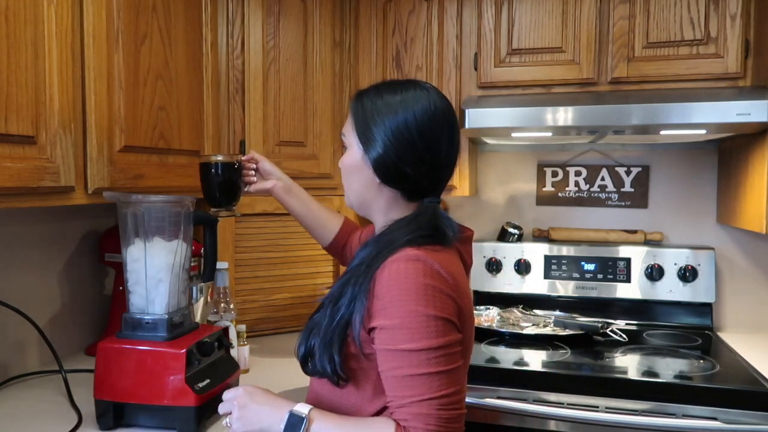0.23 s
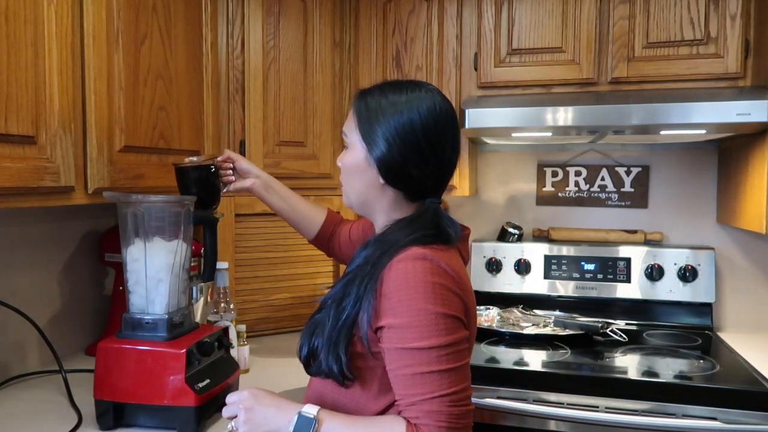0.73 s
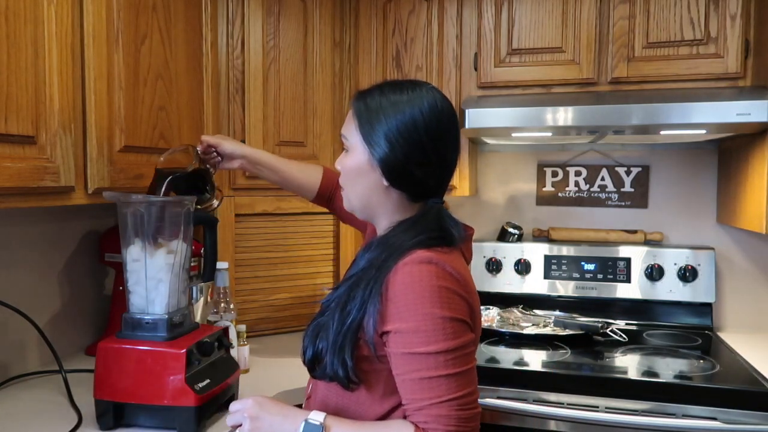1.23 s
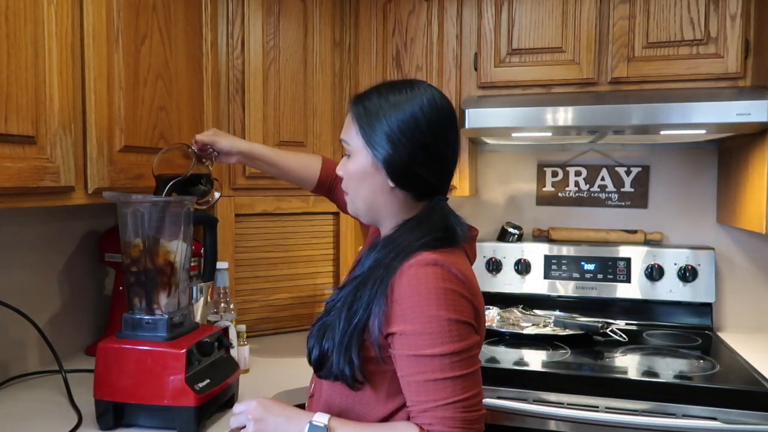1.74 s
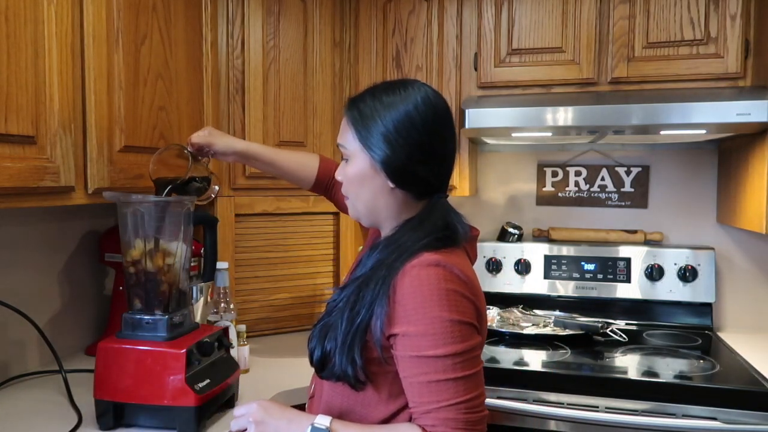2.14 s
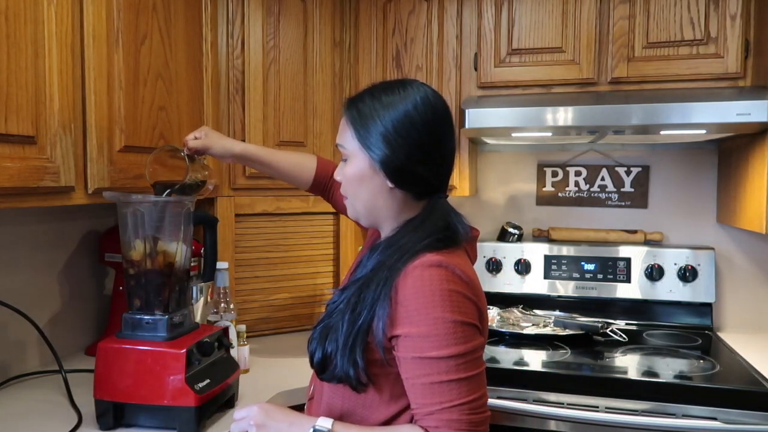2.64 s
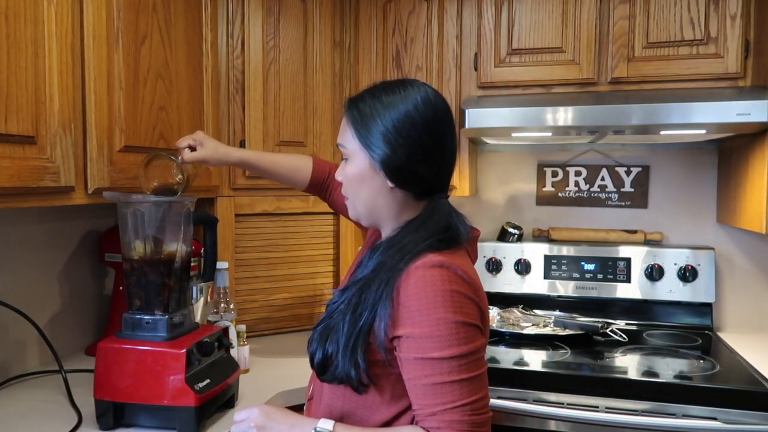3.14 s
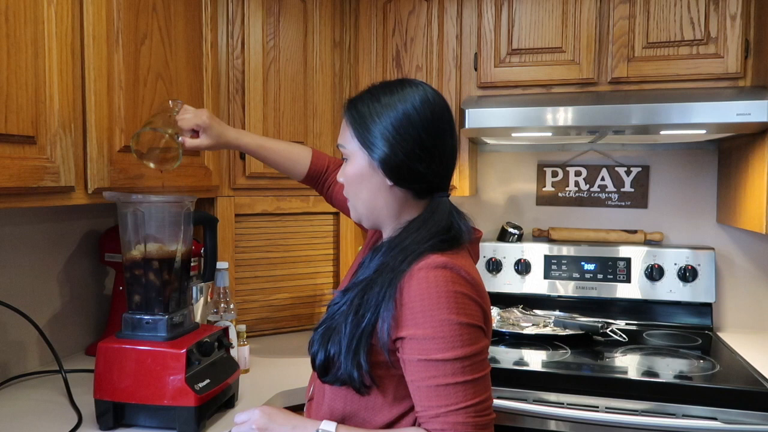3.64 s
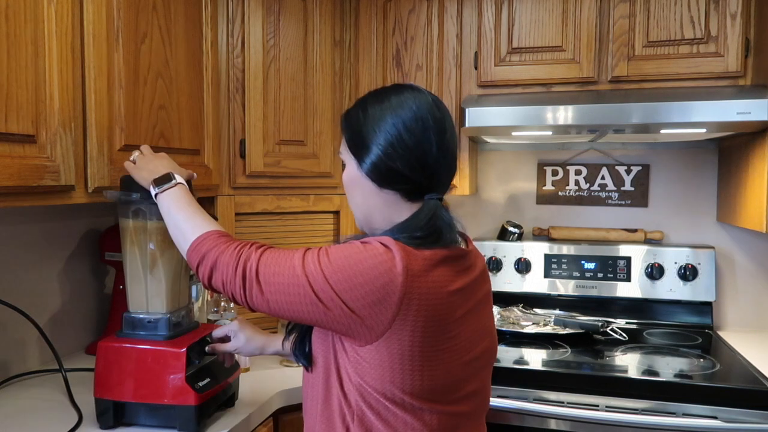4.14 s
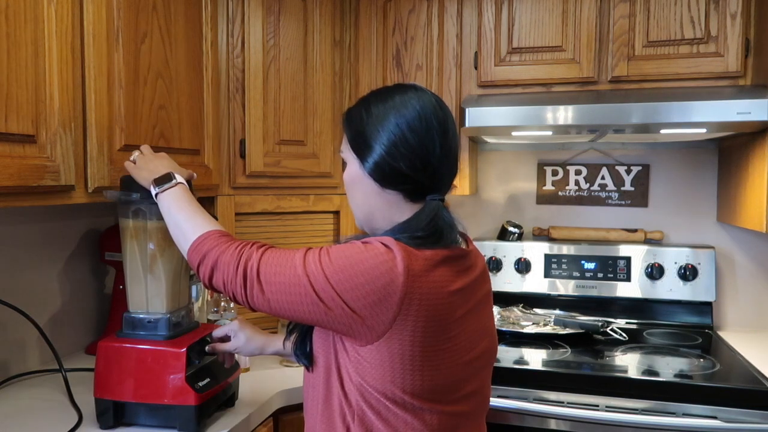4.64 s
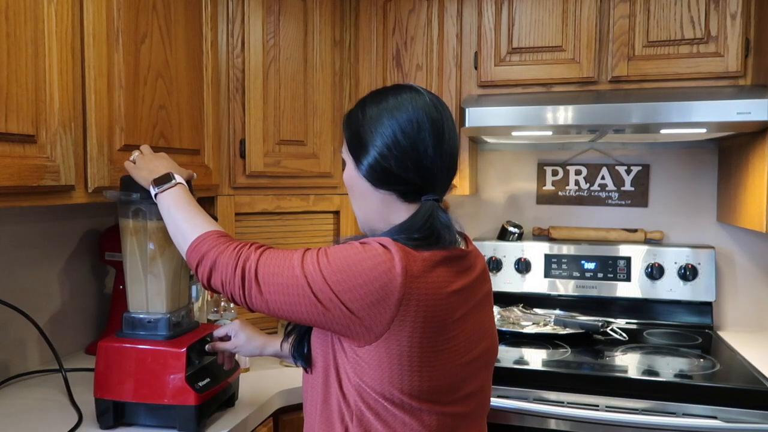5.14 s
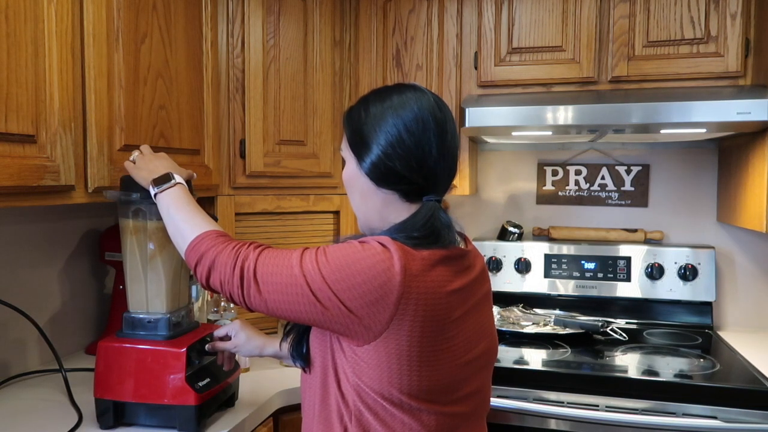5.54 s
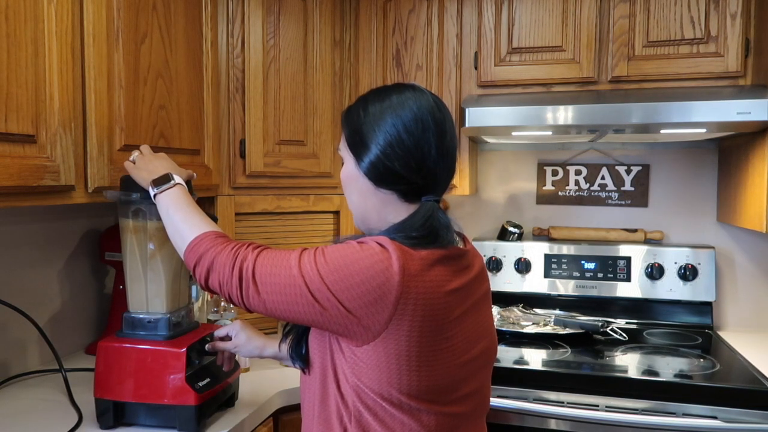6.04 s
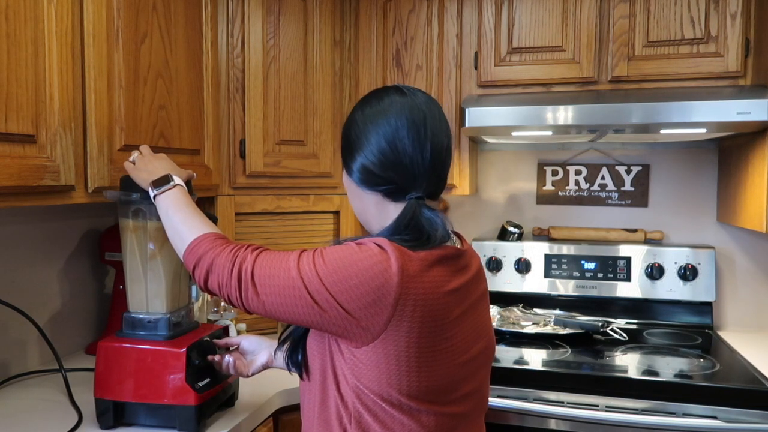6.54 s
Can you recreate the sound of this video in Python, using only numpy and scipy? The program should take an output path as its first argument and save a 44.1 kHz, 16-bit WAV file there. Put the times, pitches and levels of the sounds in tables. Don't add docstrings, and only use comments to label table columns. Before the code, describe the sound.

In a quiet home kitchen with faint refrigerator hum, two small hollow knocks sound on the counter. Coffee is poured over ice in a plastic jar: soft fizz, sliding cubes, clacks and tiny cracks, thinning out before a last few clacks. With a sudden cut a blender is roaring, its hum jolting as blades smash ice, then rising and smoothing into churning slush. Stereo microphone nearby, little echo.

```python
import sys
import numpy as np
from scipy import signal
from scipy.fft import rfft, irfft, next_fast_len
from scipy.io import wavfile

SR = 44100
rng = np.random.default_rng(int(sys.argv[2]) if len(sys.argv) > 2 else 0)


def unload_audio(sound):
    columns = np.transpose(np.atleast_2d(sound))
    steps = np.round(np.clip(columns, -1, 1) * 32767)
    wavfile.write(sys.argv[1], SR, steps.astype(np.int16))


def volts(x):
    e = np.asarray(x, float) / 20
    return 10 ** e


N = 299039

# [t/s, level/dB]
MOTOR_LOAD = [(3.75, -47), (3.8, -30.5), (3.88, -21), (4, -20), (4.2, -21), (4.4, -20), (4.55, -22),
              (4.9, -20), (5.15, -23), (5.33, -20), (5.43, -24), (5.7, -23.5), (6.0, -23), (6.4, -24.5),
              (6.78, -24)]
# [t/s, f/Hz]
BLADE_RATE = [(3.76, 221.7), (3.89, 240), (4.15, 248.7), (4.27, 263.3), (4.5, 257.9), (4.63, 252),
              (4.72, 264.3), (4.9, 269.2), (4.98, 254.6), (5.1, 256), (5.2, 251), (5.33, 269.5),
              (5.4, 283.6), (5.7, 291.3), (6.78, 287.4)]
# [multiple of blade rate, level/dB against the rumble]
BLADE_ORDERS = [(1, 0), (2, -15.5)]
# [t/s, share]
ICE_LEFT = [(3.7, .8), (5.2, .8), (5.5, .5), (6.8, .5)]
# [t/s, depth/dB, length/s]
LEVEL_DIPS = [
    (4.474, 2.5, 0.056),
    (4.765, 1.5, 0.012),
    (4.99, 10.5, 0.026),
    (5.407, 7.5, 0.23),
    (6.103, 5, 0.15),
]
# [t/s, peak level/dB]
JOLTS = [(3.837, -18), (3.885, -14.5), (3.996, -8.5), (4.111, -15), (4.169, -15), (4.238, -12.5),
         (4.268, -13), (4.379, -14), (4.539, -15), (4.575, -15.5), (4.61, -16), (4.747, -15), (4.842, -16),
         (4.877, -15), (4.958, -11.5), (5.095, -12), (5.164, -14), (5.324, -15.5), (5.653, -21),
         (5.686, -14.5), (5.722, -17.5), (5.944, -14), (6.06, -13), (6.287, -17), (6.32, -21), (6.425, -9),
         (6.626, -14), (6.688, -18.5)]
# [f/Hz, width/Hz, level/dB]
BASE_MODES = [(230.7, 20, -5.5), (352, 22.5, -9), (538, 36, -10.5)]
# [f/Hz, level/dB per Hz]
RUMBLE = [(26, -45), (45, -33), (90, -32), (140, -26), (235, 3), (323, -9), (430, -6.5), (543, -7),
          (750, -17.5), (1000, -17.5), (1400, -76)]
CHURN = [(700, -1.5), (1000, -10.5), (1350, -8), (1700, 2.5), (2200, 4.5), (2800, -2), (4000, -11),
         (5200, -19)]
SPRAY = [(3000, -4), (4500, -3), (6500, -6), (8500, -10), (10500, -21), (12500, -16), (14500, -22)]
# [t/s, peak level/dB, ring f/Hz]
HITS = [(3.793, -25, 2440), (3.832, -25, 2600), (3.9134, -19, 2360), (3.9538, -14.5, 1960),
        (4.026, -20, 1920), (4.0828, -18, 2250), (4.186, -18, 2380), (4.2791, -12, 1960),
        (4.3173, -11.5, 2160), (4.3395, -13, 1740), (4.3892, -15, 2190), (4.51, -16.5, 2250),
        (4.613, -16, 2550), (4.751, -21, 2600), (4.799, -18.5, 1930), (4.816, -19.5, 2090),
        (4.884, -23, 2660), (4.914, -33, 3428), (4.96, -22, 2650), (5.005, -13.5, 3770),
        (5.181, -17.5, 2090), (5.228, -21.5, 2370), (5.387, -14, 1790), (5.8323, -24, 1980),
        (5.875, -21, 2150), (6.043, -22.5, 1818), (6.0691, -16.5, 3270), (6.219, -22.5, 3550)]
# [t/s, peak level/dB, ring f/Hz]
SPLINTERS = [(3.948, -13.5, 5760), (4.0156, -16.5, 4930), (4.042, -11.5, 7300), (4.0874, -14, 5330),
             (4.161, -20, 5840), (4.1865, -11, 6300), (4.241, -14, 5200), (4.2791, -7, 4600),
             (4.317, -12.5, 4920), (4.359, -5.5, 5300), (4.388, -7, 5230), (4.455, -15, 4380),
             (4.495, -21, 6300), (4.508, -18, 4570), (4.6086, -12, 4970), (4.676, -18, 5030),
             (4.797, -23, 5500), (4.818, -15.5, 4730), (4.9607, -7, 5600), (5.006, -8, 5200),
             (5.179, -7.5, 5650), (5.394, -33, 4450), (5.679, -31, 6715), (5.843, -23, 6500),
             (5.934, -27, 6620), (6.005, -17, 6100), (6.045, -14, 7300), (6.0672, -7, 7000),
             (6.2164, -10, 5510)]
# [t/s, peak level/dB]
BANGS = [
    (4.2795, -25),
    (4.3884, -12),
    (5.0055, -26),
    (5.3892, -2.5),
    (6.0701, -15),
]
# [t/s, peak level/dB]
SLAPS = [
    (4.62, -21),
    (4.79, -18),
    (5.385, -22),
    (5.69, -26.5),
    (5.872, -18),
    (6.43, -33),
    (6.63, -27.5),
    (6.695, -24.5),
]
# [t/s, peak level/dB, ring f/Hz]
CHOPS = [(3.769, -29, 3120), (3.8277, -35, 3340), (3.8711, -28, 3140), (3.896, -25, 2850),
         (3.9314, -16, 3410), (3.9505, -27, 3250), (4.0177, -25, 3660), (4.082, -9, 3580),
         (4.1611, -36, 3280), (4.1854, -33, 3940), (4.2407, -26, 4500), (4.2792, -16, 4250),
         (4.316, -10, 3540), (4.359, -14, 3460), (4.3884, -7, 3500), (4.4557, -24, 3550),
         (4.494, -16, 3700), (4.51, -18.5, 4600), (4.565, -16, 3601), (4.6114, -26, 3700),
         (4.6663, -20, 3730), (4.6882, -16.5, 4430), (4.7375, -20, 3070), (4.798, -27, 3332),
         (4.815, -8.5, 4136), (4.8846, -24, 3160), (4.9132, -11, 3420), (4.962, -19, 3880),
         (5.006, -15, 3692), (5.0964, -22, 3250), (5.173, -21, 2970), (5.2568, -19, 3600),
         (5.2988, -18, 3250), (5.3891, -7, 3730), (5.6076, -27, 3050), (6.006, -21, 4500),
         (6.0431, -22, 3664), (6.0701, -6, 3300), (6.1738, -24, 3570), (6.2197, -14.5, 3550),
         (6.5513, -22, 3383), (6.6144, -22, 3430), (6.641, -32, 3005), (6.667, -25, 3340)]
# [t/s, peak level/dB, ring f/Hz]
CHIPS = [(3.913, -44, 8280), (4.0435, -36, 7900), (4.2805, -33, 8470), (4.3176, -42, 8720),
         (4.34, -34, 12600), (4.361, -18, 8003), (4.39, -17.5, 7800), (4.4528, -28, 8030),
         (4.58, -36, 8050), (4.6094, -35, 12300), (4.798, -38, 10600), (4.8823, -35, 8950),
         (4.9626, -39, 8000), (5.005, -20, 8800), (5.1786, -41, 12530), (5.2996, -31, 8260),
         (5.3916, -26.5, 11700), (5.7603, -40, 8430), (5.798, -32, 9400), (6.0052, -37, 8480),
         (6.0451, -36, 8040), (6.0691, -13, 8000), (6.2173, -30, 8430), (6.5513, -33.5, 11600)]
# [peak t/s, peak level/dB, 10 dB fall/s, boom level/dB against the slide]
SHIFTS = [(1.41, -41.5, 0.5, -39), (1.56, -37, 0.02, -26), (1.682, -30.5, 0.34, -9),
          (1.899, -32, 0.07, -10), (2.1, -50.5, 0.14, -1.5), (2.36, -43.5, 0.36, -4), (2.6, -54, 1.1, -2),
          (2.96, -52.5, 0.3, 0.5), (3.28, -43, 0.1, -5.5), (3.46, -37, 0.08, 5), (3.55, -31, 0.05, -14)]
# [t/s, level/dB]
STREAM = [(1.335, -58), (1.37, -34.5), (1.54, -56.5), (1.9, -38.5), (2.12, -42.5), (2.2, -59), (2.35, -59),
          (2.6, -55), (2.85, -57.5), (3.1, -58), (3.3, -53.5), (3.45, -57.5), (3.62, -68.5)]
# [f/Hz, level/dB per Hz]
SLIDE = [(300, -35), (600, -8.5), (1150, -10.5), (1600, 0), (2250, -2), (3300, -6), (4400, -22)]
FIZZ = [(3300, -0.5), (4200, -0.5), (4900, -2), (6000, 1), (8000, -10), (10000, -21), (12500, -22),
        (15500, -44)]
# [f/Hz, width/Hz, level/dB]
JAR_MODES = [(545, 69, 1), (685, 71, -6), (982, 19, -6.5), (1540, 113, 10), (1890, 65, 0), (2230, 90, 9.5),
             (2827, 36, 6), (3300, 72, 0.5)]
# [t/s, peak level/dB, ring f/Hz, low thud level/dB]
CLACKS = [(1.352, -40, 4000, -40), (1.371, -42.5, 980, -40), (1.4088, -28, 2700, -50),
          (1.4336, -23, 2080, -50), (1.4607, -21.5, 1830, -16), (1.5181, -27, 1660, -16),
          (1.5754, -19.5, 1950, -13), (1.621, -26.5, 2670, -38), (1.6866, -19.5, 3200, -4.5),
          (1.7878, -23.5, 1700, -25), (1.8352, -26, 1640, -6.5), (1.8707, -21.5, 2090, -6.5),
          (2.0211, -24.5, 2630, -22), (2.0585, -24.5, 2100, -18.5), (2.0814, -24.5, 2230, -38),
          (2.333, -28.5, 1500, -5), (2.352, -35, 2120, -6), (2.375, -26, 1560, -11),
          (2.4683, -27.5, 2030, -13.5), (2.56, -37.5, 1610, 7.5), (2.569, -31.5, 2300, -6.5),
          (2.7806, -33.5, 2330, -6.5), (2.8704, -40, 3320, -10.5), (2.9357, -37.5, 3300, -0.5),
          (2.962, -43, 1700, 3), (2.982, -37.5, 1620, -10), (3.2764, -39, 1800, -11.5),
          (3.3418, -26, 3850, -21), (3.4212, -36, 1590, 8.5), (3.4653, -31, 1580, -11),
          (3.4881, -19, 2160, -16), (3.56, -29.5, 2580, -1.5), (3.605, -26.5, 1970, -17)]
# [t/s, peak level/dB, ring f/Hz]
CRACKS = [(1.337, -47, 11300), (1.3435, -50, 6900), (1.368, -37, 6440), (1.379, -43, 6600),
          (1.417, -38, 4300), (1.484, -35.5, 6360), (1.5114, -38.5, 5740), (1.597, -41, 6400),
          (1.765, -39, 6100), (1.808, -44, 6100), (1.864, -32.5, 5500), (1.9463, -45, 5850),
          (2.018, -47, 5800), (2.073, -27.5, 4570), (2.135, -37, 5860), (2.335, -44.5, 5520),
          (2.405, -39, 4550), (2.47, -45, 4630), (2.5516, -44.5, 6570), (2.6284, -43, 5550),
          (2.7044, -46, 5840), (2.838, -43, 7070), (2.87, -42.5, 5600), (3.144, -46, 5950),
          (3.354, -38, 4300), (3.45, -48, 6200), (3.485, -45, 4640), (3.5378, -35, 4660)]
# [t/s, peak level/dB, f/Hz]
SQUEAKS = [
    (2.725, -40, 3430),
    (2.834, -41, 3400),
    (2.855, -40, 3440),
    (2.983, -40, 1560),
]
# [t/s, peak level/dB, ring f/Hz]
TICKS = [(1.3993, -49, 8100), (1.4417, -42, 7930), (1.6009, -35.5, 7940), (1.6343, -40, 7880),
         (1.6882, -42, 7800), (1.7086, -34.5, 9350), (1.7585, -44, 11000), (1.7959, -45, 9150),
         (1.8279, -40, 8000), (1.8433, -35, 8460), (1.9715, -36, 8140), (2.0623, -45, 7600),
         (2.136, -34, 8200), (2.3272, -41, 8740), (2.3502, -50, 8790), (2.3831, -49, 8410),
         (2.4205, -44, 9070), (2.4719, -38, 8400), (2.5846, -40, 8700), (2.6101, -41, 7520),
         (2.6455, -39, 8400), (2.7138, -43, 8180), (2.8585, -37, 8200), (3.1863, -49, 11000),
         (3.2636, -45, 10900), (3.4192, -51, 8760), (3.4507, -47, 8800), (3.5405, -50, 7610),
         (3.7575, -45, 7200)]
# [t/s, peak level/dB, brightness level/dB, T60/s, hollow body level/dB]
KNOCKS = [
    (0.066, -39, -4, 0.05, -18),
    (0.075, -22.5, 5, 0.081, -6),
    (0.083, -23.5, -7, 0.1, -12),
    (0.131, -37, -5, 0.054, -25),
    (0.901, -34.5, 3.5, 0.053, -32),
    (0.906, -28, -3.5, 0.058, -27),
    (0.924, -36, -19, 0.043, -25),
    (1.016, -54.5, 0.5, 0.08, -5),
]
# [f/Hz, level/dB, T60/s]
COUNTER_MODES = [(754, 4, 0.057), (826, 10, 0.06), (913, 6.5, 0.035), (1100, -9, 0.036), (1500, 2.5, 0.048),
                 (1700, -1, 0.05), (2090, -2, 0.043), (2300, -4, 0.036)]
# [f/Hz, level/dB per Hz]
AIR = [(29, -57), (50, -35), (137, -15), (165, -9), (313, -7), (351, -7.5), (385, -10.5), (1060, -20),
       (1210, -21.5), (1420, -22.5), (12000, -45.5), (15600, -85), (22000, -120)]
# [f/Hz, likeness]
AIR_LIKENESS = [(60, 0.77), (240, 0.8), (950, 0.43), (3770, 0.28), (15000, -0.6)]
# [t/s, level/dB]
AIR_LEVEL = [(0, -3), (1.4, -3), (1.6, 5.5), (3.7, 2.5), (3.8, 1), (6.8, -44.5)]
# [f/Hz, rms level/dB]
FRIDGE = [(58, -91), (61, -85), (116, -77), (168, -72.5), (296, -74.5), (350, -69), (415, -74.5)]
# [f/Hz, phase/rad]
PORT_PHASE = [(100, 0), (3300, .05), (5500, .55), (7700, 1.0), (9100, 1.4), (11000, 1.6), (16000, 1.8)]
# [f/Hz, level/dB]
PORT_BALANCE = [(380, 0), (700, .5), (1300, 0), (2400, .6), (4400, 2.1), (8100, 2.6), (15000, .5)]
# [f/Hz, level/dB]
ROOM_SIDE = [(60, -24), (150, -27), (300, -30), (600, -24), (1200, -25), (2500, -19), (5000, -7),
             (8000, -2), (14000, 1)]
# [f/Hz, level/dB]
MICROPHONE = [(25, -16), (58, 0), (11000, 0), (13500, -3), (15000, -7), (17000, -25)]


def blender():
    blade_hz, load_db, churn_db, spray_db, gate = run_levels()
    lumps = in_time(ICE_LEFT)[0]
    surge = jolts()
    waver = 1 + 0.016 * lumps * drift(19.8)
    turn = 2 * np.pi * np.cumsum(blade_hz * waver) / SR
    tones = sum(np.sin(k * turn) * volts(db + lumps * (4.0 * drift(38) + 2.5)) for k, db in BLADE_ORDERS)
    shaft_db = -47 + 0.84 * (load_db + 21.5) + 2.0 * drift(2.8)
    shaft = volts(shaft_db) * np.sin(turn / 4)
    hum = volts(2.0 - 3.75 * lumps) * surge * tones
    rumble = volts(-8.5 + 3.7 * lumps) * surge ** 0.33 * base_rumble()
    churn = patchy(grains(1800, spread_db=2.5), CHURN, 2.0 * lumps, 3.55 * lumps + 1.5, rate=7.3)
    churn = churn + 0.37 * lumps * blips(250, CHURN, cycles=54.0)
    spray = patchy(grains(3300, spread_db=1.5), SPRAY, 3.8 * lumps, 4.5 * lumps, rate=6.4)
    spray = spray + 0.5 * lumps * blips(370, SPRAY, cycles=24.0)
    slush = volts(churn_db + 1.5) * churn + volts(spray_db) * spray
    return gate * (shaft + volts(load_db) * (hum + rumble) + slush + cooling_fan())


def run_levels():
    load_db, gate = in_time(MOTOR_LOAD)
    blade_hz = in_time(BLADE_RATE)[0]
    t = np.arange(N) / SR
    edge_s, recover_s = 0.013, 0.052
    for s, depth_db, length in LEVEL_DIPS:
        dip = np.minimum((t - s) / edge_s + 1, (s + length - t) / recover_s + 1)
        load_db = load_db - depth_db * np.clip(dip, 0, 1)
    stir_up_db = np.interp(t, (3.66, 3.92), (-13, 0))

    def driven(blows, base_db, share, blow_db, fall_s):
        s, peak_db, _ = np.transpose(blows)
        steady_db = base_db + stir_up_db + share * (load_db + 23.5)
        return level_of(volts(2 * steady_db) + swell(s, peak_db + blow_db, 0.008, fall_s))

    churn_db = driven(HITS, -37, share=0.99, blow_db=-15.5, fall_s=0.068)
    spray_db = driven(SPLINTERS, -44.5, share=0.38, blow_db=-24.5, fall_s=0.024)
    return blade_hz, load_db, churn_db, spray_db, gate


def jolts():
    s, db = np.transpose(JOLTS)
    free_db, surge_db, rise_s, fall_s = -4.5, 13.5, 0.0086, 0.024
    return np.sqrt(volts(2 * free_db) + swell(s + rise_s, db + surge_db, rise_s, fall_s))


def base_rumble():
    shake = rng.standard_normal(N) * volts(2.05 * drift(25))
    base = sum(volts(db) * rms_one(resonate(shake, hz, width)) for hz, width, db in BASE_MODES)
    noise = rng.standard_normal(N)
    return base + volts(-1.0) * patchy(noise, RUMBLE, shared_db=0.5, own_db=-4.5, rate=15.8)


def cooling_fan():
    return volts(-45) * rms_one(narrow(rng.standard_normal(N), 1120, 2230))


def blade_hits():
    out = np.zeros(N)
    for s, db, hz in HITS:
        add(out, s, db - 0.5, .055, lambda x: narrow(x, hz, 480) + 0.31 * narrow(x, 3350, 1240), rise=0.00061)
    return out


def splinters():
    out = np.zeros(N)
    for s, db, hz in SPLINTERS:
        add(out, s, db - 6.0, .024, lambda x: narrow(x, hz, 1370) + 0.3 * narrow(x, 6300, 1600), rise=0.0013)
    return out


def bangs():
    out = np.zeros(N)
    for s, db in BANGS:
        add(out, s + 0.0011, db + 1.5, .011,
            lambda x: narrow(x, 2450, 1700) + 0.03 * narrow(x, 11500, 3000), rise=0.0004)
        add(out, s + 0.0032, db - 15.5, .09, lambda x: narrow(x, 3600, 1800), length=.15)
    return out


def slaps():
    out = np.zeros(N)
    for s, db in SLAPS:
        add(out, s, db, .08, lambda x: narrow(x, 542, 77) + 0.27 * narrow(x, 930.8, 127), rise=0.0049)
    return out


def chops_and_chips():
    out = np.zeros(N)
    for s, db, hz in CHOPS:
        add(out, s, db - 7.0, .022, lambda x: narrow(x, hz, 920), rise=0.00066, length=.06)
    for s, db, hz in CHIPS:
        add(out, s, db, .012,
            lambda x: narrow(x, hz, 1100) + 0.28 * narrow(x, 12200, 3000), rise=0.00033, length=.06)
    return out


def counter_thumps():
    out = np.zeros(N)
    for s, db, _ in HITS:
        add(out, s, db - 22.5, 0.1, lambda x: narrow(x, 70.4, 130), length=.15)
    return out


def pour():
    boom_db, slide_db, fizz_db, gate = pour_levels()
    rub = grains(1200, spread_db=3.0)
    modes = [volts(db + 4.5 * drift(6.0)) * narrow(rub, hz, 2 * width) for hz, width, db in JAR_MODES]
    boom = rms_one(sum(modes[:3]))
    slide = patchy(rub, SLIDE, shared_db=0.0, own_db=5.5, rate=5.5)
    slide = slide + 0.86 * rms_one(sum(modes[3:])) + 0.69 * blips(150, SLIDE, cycles=50.0)
    fizz = patchy(grains(3000, spread_db=2.5), FIZZ, shared_db=4.5, own_db=5.5, rate=11)
    fizz = fizz + 0.4 * blips(150, FIZZ, cycles=110.0)
    return gate * (volts(boom_db - 1.5) * boom + volts(slide_db - 5.0) * slide + volts(fizz_db - 0.6) * fizz)


def pour_levels():
    s, db, fall_s, boom_db = np.transpose(SHIFTS)
    rise_s, boom_lag_s, settle_db = 0.053, 0.044, -84
    slide = swell(s, db, rise_s, fall_s) + volts(2 * settle_db)
    boom = swell(s + boom_lag_s, db + boom_db, rise_s, fall_s)
    span_s = (1.339, 3.75)
    gate = in_time(np.c_[span_s, span_s])[1]
    return level_of(boom), level_of(slide), in_time(STREAM)[0], gate


def cube_clacks():
    out = np.zeros(N)
    for s, db, hz, thud_db in CLACKS:
        add(out, s, db, .075, lambda x: narrow(x, hz, 750) + 0.12 * narrow(x, 2700, 1300), rise=0.0018)
        add(out, s + 0.00456, db + thud_db + 0.5, .11,
            lambda x: narrow(x, 594, 177) + 0.6 * narrow(x, 940, 120), rise=0.0016)
    return out


def ice_cracks():
    out = np.zeros(N)
    for s, db, hz in CRACKS:
        add(out, s, db + 3, .05, lambda x: narrow(x, hz, 500) + .03 * narrow(x, 9000, 6000), rise=.002)
    return out


def ice_squeaks():
    out = np.zeros(N)
    for s, db, hz in SQUEAKS:
        add(out, s, db, .14, lambda x: narrow(x, hz, 180), rise=0.0056)
    return out


def drop_ticks():
    out = np.zeros(N)
    for s, db, hz in TICKS:
        add(out, s, db, .016,
            lambda x: narrow(x, hz, 940) + 0.17 * narrow(x, 10800, 2100), rise=0.00048, length=.06)
    return out


def knocks():
    def counter(x):
        return sum(volts(d) * narrow(x, f, 6.9 / t) / np.sqrt(4.4 / t) for f, d, t in COUNTER_MODES)

    def cabinet(x):
        return narrow(x, 380, 100) + 0.14 * narrow(x, 90, 80)

    def clatter(x):
        return narrow(narrow(x, 1940, 1400), 2260, 1700)

    def contact(x):
        return narrow(x, 3500, 600) + .4 * narrow(x, 4440, 450) + 0.24 * narrow(x, 5800, 600)

    out = np.zeros(N)
    for s, db, bright_db, t60, body_db in KNOCKS:
        add(out, s, db + 2.0, 1.1 * t60, counter)
        add(out, s, db + body_db, t60, cabinet, rise=0.0018)
        add(out, s, db + bright_db - 3.0, 0.82 * t60, clatter, rise=0.004)
        add(out, s, db + bright_db - 12.0, .012, contact)
    return out


def kitchen_air():
    hz, t = np.fft.rfftfreq(N, 1 / SR), np.arange(N) / SR
    alike = np.clip(at_hz(AIR_LIKENESS, hz), -1, 1)
    mid, side = rfft(rng.standard_normal((2, N))) * volts(at_hz(AIR, hz))
    noise = irfft(np.sqrt(1 + alike) * mid + np.sqrt(1 - alike) * side * [[1], [-1]], N)
    hum = sum(volts(db + 1.0 + 3.6 * drift(3.1)) * np.sin(2 * np.pi * f * t) for f, db in FRIDGE)
    return volts(in_time(AIR_LEVEL)[0]) * (volts(-62) * rms_one(noise) + hum)


def ports(x):
    size = next_fast_len(N + SR)
    hz, t = np.fft.rfftfreq(size, 1 / SR), np.arange(SR // 2) / SR
    room_t60_s, near_t60_s = 0.21, 0.033
    decay = volts(-60 * t / [[room_t60_s], [near_t60_s]]) * np.minimum(t / 0.01, 1)
    tails = rng.standard_normal((2, len(t))) * decay
    mid, side = rfft(tails / np.sqrt(np.sum(tails ** 2, axis=1, keepdims=True)), size)
    room = volts(-10) * mid / (1 + 1j * hz / 9200)
    sign = np.array([[1], [-1]])
    direct = volts(sign * at_hz(PORT_BALANCE, hz) / 2) * np.exp(1j * sign * at_hz(PORT_PHASE, hz) / 2)
    sound = rfft(x, size) * volts(at_hz(MICROPHONE, hz))
    scattered = irfft(sound * side * volts(at_hz(ROOM_SIDE, hz)), size)[:N]
    scattered = scattered * drift(9.3)
    return irfft(sound * direct * (1 + room), size)[:, :N] + sign * scattered


def rms_one(x):
    return x / np.sqrt(np.mean(x ** 2) + 1e-20)


def level_of(power):
    return 10 * np.log10(power + 1e-20)


def in_time(rows, fade=0.034):
    s, *columns = np.transpose(rows)
    t = np.arange(N) / SR
    gate = np.clip((t - s[0]) / fade, 0, 1) * np.clip((s[-1] + fade - t) / fade, 0, 1)
    return [np.interp(t, s, c) for c in columns] + [gate]


def at_hz(points, hz):
    f, value = np.transpose(points)
    return np.interp(np.log(hz + 1), np.log(f + 1), value)


def drift(rate):
    r = np.exp(-80 * np.pi * rate / SR)
    noise = rng.standard_normal(N // 40 + 2002)
    slow = signal.lfilter([1], [1, -2 * r, r * r], noise)[2000:]
    return np.interp(np.arange(N) / 40, np.arange(len(slow)), rms_one(slow))


def swell(s, db, rise_s, fall_s):
    since = np.arange(0, N, 32)[:, None] / SR - s
    power = volts(2 * (db - 10 * np.maximum(since / fall_s, -since / rise_s))).sum(axis=1)
    return np.interp(np.arange(N) / 32, np.arange(len(power)), power)


def resonate(x, hz, width_hz):
    r = np.exp(-np.pi * width_hz / SR)
    poles = [1, -2 * r * np.cos(2 * np.pi * hz / SR), r * r]
    return signal.lfilter(np.array([1, 0, -1]) * (1 - r * r) / 2, poles, x)


def narrow(x, hz, width_hz):
    return resonate(resonate(x, hz, width_hz), hz, width_hz)


def grains(per_s, spread_db):
    sizes = volts(spread_db * np.minimum(rng.exponential(1, N), 5)) * rng.standard_normal(N)
    return sizes * (rng.random(N) < per_s / SR) + 1e-18


def blips(per_s, spectrum, cycles):
    clicks = grains(per_s, spread_db=3.0)
    pitches = np.geomspace(spectrum[0][0], spectrum[-1][0], 24)
    dealt = rng.integers(0, len(pitches), N)
    out = np.zeros(N)
    for k, hz in enumerate(pitches):
        out += volts(at_hz(spectrum, hz)) * narrow(clicks * (dealt == k) + 1e-18, hz, 2.55 * hz / cycles)
    return rms_one(out)


def patchy(source, spectrum, shared_db, own_db, rate):
    hz = np.fft.rfftfreq(N, 1 / SR)
    whole = rfft(source) * volts(at_hz(spectrum, hz))
    together = drift(rate)
    lowest, highest = spectrum[0][0], spectrum[-1][0]
    out = np.zeros(N)
    for centre in lowest * 2 ** np.arange(0, np.log2(highest / lowest) + .01, 1 / 3):
        band = np.cos(np.pi * np.clip(1.5 * np.log2((hz + 1) / centre), -.5, .5)) ** 2
        own = np.roll(irfft(whole * band, N), rng.integers(N))
        out += own * volts(shared_db * together + own_db * drift(2 * rate))
    return rms_one(out)


def add(out, s, peak_db, t60, shape, rise=0.0015, length=.35):
    at, t = round(s * SR), np.arange(round(length * SR)) / SR
    envelope = volts(-60 * t / max(t60, .004)) * np.minimum(t / rise, 1)
    burst = shape(rng.standard_normal(len(t)) * envelope)
    out[at:at + len(t)] += (volts(peak_db) * burst / np.abs(burst).max())[:N - at]


def scene():
    running = blender() + blade_hits() + splinters() + bangs() + slaps() + chops_and_chips() + counter_thumps()
    pouring = pour() + cube_clacks() + ice_cracks() + ice_squeaks() + drop_ticks()
    return ports(running + pouring + knocks()) + kitchen_air()


def low_pass(x):
    return signal.sosfilt(signal.butter(12, 16000, fs=SR, output="sos"), x)


def record(dry):
    mix = np.clip(dry, -1, 1)
    return low_pass(mix)


dry = scene()
out = record(dry)
unload_audio(out)
```